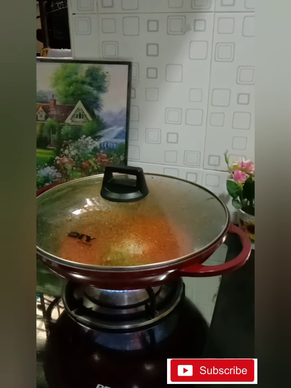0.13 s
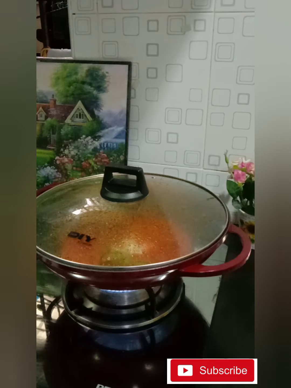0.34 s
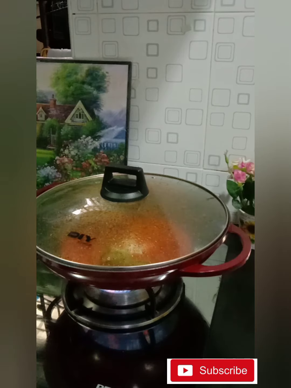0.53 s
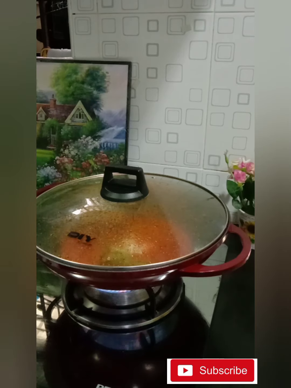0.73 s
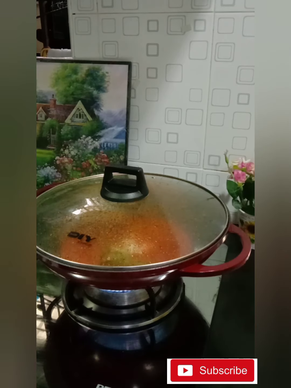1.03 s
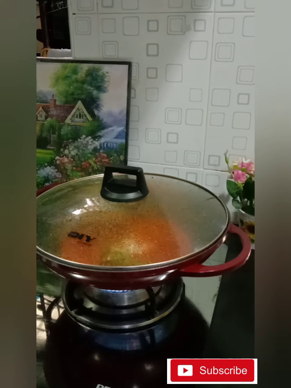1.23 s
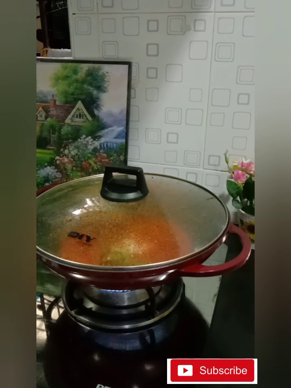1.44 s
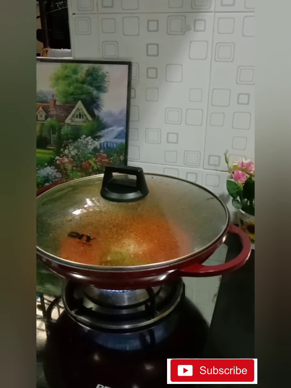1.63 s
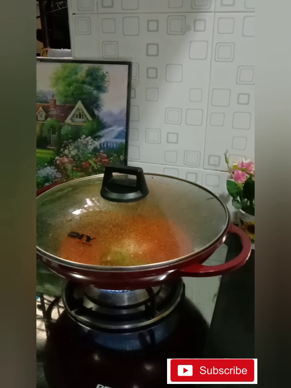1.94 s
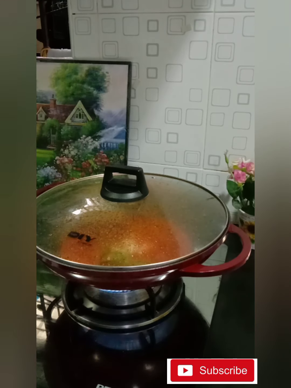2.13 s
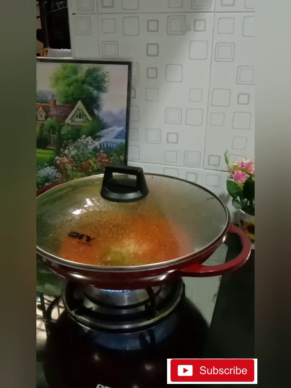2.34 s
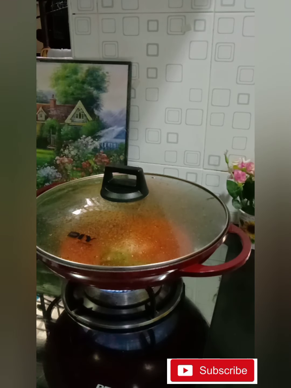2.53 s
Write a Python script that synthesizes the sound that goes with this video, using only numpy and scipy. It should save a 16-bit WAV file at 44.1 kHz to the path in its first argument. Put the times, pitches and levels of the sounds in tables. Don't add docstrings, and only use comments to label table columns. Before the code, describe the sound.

Paste frying in a lidded wok gives a steady faint fizz over a low burner hum, close to a phone microphone. Dishes tap at the start, then clink, scrape and clatter loudly late, with short room echo.

```python
import sys
import numpy as np
from scipy import signal
from scipy.fft import rfft, irfft
from scipy.io import wavfile
from scipy.ndimage import uniform_filter1d

SR = 44100
rng = np.random.default_rng(int(sys.argv[2]) if len(sys.argv) > 2 else 0)


def transcribe(signal):
    frames = np.atleast_2d(signal).T
    limited = np.clip(frames, -1, 1)
    pcm = np.round(limited * 32767).astype(np.int16)
    wavfile.write(sys.argv[1], SR, pcm)


def amplitude_ratio(level_db):
    exponent = np.asarray(level_db, float) / 20
    return 10 ** exponent


N = 119070


def evened(x):
    return x / np.sqrt(np.mean(x ** 2) + 1e-20)


def read(points, hz):
    f, value = np.transpose(points)
    return np.interp(np.log(hz + 1), np.log(f + 1), value)


def curve(points):
    return amplitude_ratio(np.interp(np.arange(N) / SR, *np.transpose(points)))


def colour(x, points):
    hz = np.fft.rfftfreq(len(x), 1 / SR)
    octaves_below = np.maximum(np.log2(points[0][0] / (hz + 1)), 0)
    return irfft(rfft(x) * amplitude_ratio(read(points, hz) - 22 * octaves_below), len(x))


def resonate(x, hz, width_hz):
    r = np.exp(-np.pi * width_hz / SR)
    gain = (1 - r * r) / 2
    return signal.lfilter([gain, 0, -gain], [1, -2 * r * np.cos(2 * np.pi * hz / SR), r * r], x)


def wander(seconds):
    size = max(int(seconds * SR), 2)
    return evened(uniform_filter1d(uniform_filter1d(rng.standard_normal(N), size), size))


def pops(per_s, spread_db):
    size = amplitude_ratio(spread_db * np.minimum(rng.exponential(1, N), 5))
    return size * (rng.random(N) < per_s / SR) * rng.choice([-1., 1.], N)


def air(rings, wander_db):
    total = np.zeros(N)
    for hz, width_hz, db in rings:
        mode = resonate(resonate(rng.standard_normal(N), hz, width_hz), hz, 2 * width_hz)
        total += amplitude_ratio(db + wander_db * wander(0.053)) * evened(mode)
    return evened(total)


def waver(hz, radians, seconds):
    return np.sqrt(2) * np.sin(2 * np.pi * hz * np.arange(N) / SR + radians * wander(seconds))


def drifting_tones(tones):
    t, out = np.arange(N) / SR, np.zeros(N)
    for start, length, hz, db in tones:
        shape = np.clip(np.minimum(t - start, start + length - t) / 0.011, 0, 1)
        out += amplitude_ratio(db) * shape * waver(hz, 1.04, 0.014)
    return out


# frequency_hz, density_db (per Hz)
FIZZ_SPECTRUM = [(2700, -22), (3100, -3), (3600, 0), (4000, -8.5), (5100, -5.5), (8000, -4.5), (16000, -8)]
# frequency_hz, width_hz, level_db
LID_RINGS = [(3655, 24, 0.5), (4394, 146, 4.5), (5690, 260, -3), (6640, 55, -6), (7390, 140, -2),
             (7940, 54, 2), (8360, 110, -3)]
# time_s, level_db
HEAT = [(0, -49.5), (.5, -50.5), (1.8, -49.5), (2.7, -50)]
FIZZ_DB, LID_RINGS_DB = -49, -5.5


def fizz():
    drive = rng.standard_normal(N) + amplitude_ratio(-8) * evened(pops(per_s=3300, spread_db=5.5))
    rings = np.zeros(N)
    for hz, width_hz, db in LID_RINGS:
        rings += amplitude_ratio(db + 2.3 * wander(0.033)) * evened(resonate(drive, hz, width_hz))
    flicker = amplitude_ratio(0.9 * wander(0.025) + 0.4 * wander(0.1))
    frying = evened(colour(drive, FIZZ_SPECTRUM)) + amplitude_ratio(LID_RINGS_DB) * evened(rings)
    return amplitude_ratio(FIZZ_DB) * evened(curve(HEAT)) * flicker * frying


# frequency_hz, width_hz, level_db
LID_AIR = [(526, 101, -1), (656, 170, 0), (791.6, 34, 0.5), (273, 110, -13.5)]
RIM_AIR = [(1228, 140, 6), (1306, 25, -4), (1434, 62, 1), (1598, 70, -5.5)]
GLASS_AIR = [(1919, 64, 1.5), (2132, 190, 0), (2387, 34, -3.5), (2920, 51, -3)]
# time_s, level_db
BUBBLING = [(0, -56.5), (.25, -54), (.42, -52.5), (.55, -65.5), (.7, -58.5), (.95, -52.5), (1.2, -52),
            (1.28, -64), (1.6, -58.5), (1.78, -55), (1.95, -53), (2.03, -67.5), (2.2, -54), (2.5, -52),
            (2.63, -59), (2.66, -51.5)]
STEAM = [(.3, -54.5), (.36, -63), (.5, -60), (.58, -53.5), (.68, -57.5), (.78, -54.5), (1.02, -54.5),
         (1.07, -55.5), (1.15, -51.5), (1.45, -61), (1.55, -54), (1.7, -62.5), (1.85, -57), (2.6, -51.5),
         (2.7, -59.5)]
SPATTER = [(.3, -62), (.36, -71), (.55, -68), (.6, -62), (1.2, -57), (1.26, -64), (1.45, -64.5),
           (1.55, -61.5), (1.75, -62.5), (2.1, -59), (2.7, -64.5)]


def simmer():
    bubbling = curve(BUBBLING) * air(LID_AIR, wander_db=1.2)
    steam = curve(STEAM) * air(RIM_AIR, wander_db=2.5)
    spatter = curve(SPATTER) * air(GLASS_AIR, wander_db=2.0)
    return bubbling + steam + spatter


# start_s, length_s, pitch_hz, level_db
GURGLES = [(0.79, 0.062, 250, -62), (0.62, .05, 290, -60), (2, 0.043, 352, -57.5), (2.115, .045, 150, -60),
           (1.33, .05, 1100, -53.5), (1.37, 0.053, 512, -58), (1.27, 0.052, 590, -61.5),
           (1.47, 0.126, 806, -52.5), (1.67, 0.066, 602, -55.5), (1, 0.117, 1655, -60.5),
           (1.73, 0.095, 1200, -59), (1.87, 0.11, 1442, -60), (.54, 0.108, 1100, -61),
           (1.63, 0.039, 76, -65.5), (.59, .05, 79, -69), (1.96, 0.033, 130, -64.5), (1.7, 0.04, 150, -65),
           (0.263, 0.08, 100, -68.5), (2.385, .04, 70, -63)]


def gurgles():
    return drifting_tones(GURGLES)


# start_s, peak_db, decay_s
SPITS = [
    (1.103, -33, 0.081),
    (1.64, -31, 0.059),
    (1.739, -26, .021),
    (1.822, -35, 0.12),
    (1.983, -41, .14),
]
# frequency_hz, density_db (per Hz)
SPIT_SPECTRUM = [(1200, -5.5), (2530, -0.5), (4360, 3), (6100, -5), (7820, 2), (16000, -18.5)]
SPIT_DB, SPIT_RISE_S = -14, 0.0062


def spits():
    t, level = np.arange(N) / SR, np.zeros(N)
    for start, db, decay_s in SPITS:
        u = np.maximum(t - start, 0)
        level += amplitude_ratio(db + SPIT_DB) * np.minimum(u / SPIT_RISE_S, 1) * np.exp(-u / decay_s)
    hiss = rng.standard_normal(N) + 0.66 * evened(pops(per_s=1500, spread_db=-1.5))
    return level * evened(colour(hiss, SPIT_SPECTRUM))


# start_s, length_s, pitch_hz, level_db
WHISTLES = [
    (1.538, 0.092, 12420, -56),
    (1.778, 0.023, 12850, -47.5),
]


def whistles():
    return drifting_tones(WHISTLES)


# start_s, level_db, rattle_s
TAP = [
    (.0132, -21.5, 0.0023),
    (.0165, -22.5, 0.0067),
    (.033, -31, 0.0029),
    (.052, -29.5, 0.0052),
    (.105, -47, 0.011),
]
# pitch_hz, level_db, t60_s
TAP_MODES = [(540, -12, .04), (1600, -8, .008), (2300, -7, .008), (5500, -19, .008), (7900, -15, .006)]
# frequency_hz, density_db (per Hz)
TAP_CRACK = [(260, -47), (540, -13), (1500, 2), (2500, 4.5), (3700, -5.5), (6000, -28), (8100, -15),
             (15900, -25)]
# start_s, level_db, rattle_s
NUDGE = [
    (2.357, -28.5, 0.0052),
    (2.369, -30, 0.012),
]
# start_s, level_db, rattle_s
CLINK = [
    (2.16, -31, 0.0041),
    (2.165, -28, 0.0034),
    (2.18, -32.5, 0.0052),
    (2.2, -33.5, 0.0094),
]
# pitch_hz, level_db, t60_s
CLINK_MODES = [(1580, 0, .03), (2480, 4, .04), (3005, 5, .07), (3840, -1, .02), (5520, -11, .01),
               (7340, -15, .02), (8300, -15, .01)]
# frequency_hz, density_db (per Hz)
CLINK_CRACK = [(600, -21.5), (1300, -5), (2000, -19.5), (3200, -6), (6700, -33), (8000, -17.5),
               (16000, -38)]
# start_s, level_db, rattle_s
SCRAPE = [
    (2.234, -26, 0.0079),
    (2.243, -27.5, 0.004),
    (2.252, -29, 0.004),
    (2.259, -29, 0.0036),
    (2.269, -32.5, 0.0035),
]
# pitch_hz, level_db, t60_s
SCRAPE_MODES = [(1380, -3, .03), (1760, 4, .05), (2980, -2, .02), (3790, -6, .03), (5350, -9, .008),
                (8080, -11, .006)]
# frequency_hz, density_db (per Hz)
SCRAPE_CRACK = [(450, -10), (1000, -10), (1500, 1), (2100, -12.5), (3100, 0), (6500, -19), (8100, -9),
                (16000, -23)]
# start_s, level_db, rattle_s
CLATTER = [
    (2.3785, -20, 0.0024),
    (2.3835, -13, 0.0027),
    (2.395, -21, 0.0044),
    (2.407, -21, 0.0063),
    (2.422, -39, 0.0016),
    (2.434, -26.5, 0.0051),
    (2.462, -31.5, 0.0053),
    (2.474, -35, 0.0062),
    (2.52, -38, 0.0043),
]
# pitch_hz, level_db, t60_s
CLATTER_MODES = [(370, -21, .04), (660, -21, .04), (1230, -3, .04), (1300, -2, .05), (1407, 0, .05),
                 (1517, 1, .05), (1612, -2, .05), (1722, -4, .05), (3390, -2, .03), (3512, 3, .03),
                 (3560, 2, .04), (3628, 0, .03), (5550, -17, .008), (8100, -14, .005)]
# frequency_hz, density_db (per Hz)
CLATTER_CRACK = [(160, -28), (420, -18.5), (1300, -6.5), (2100, -13.5), (3100, -4), (4700, -14.5),
                 (8000, -21), (15900, -26)]


def knocks():
    return [struck(TAP, TAP_MODES, TAP_CRACK), struck(CLINK, CLINK_MODES, CLINK_CRACK),
            struck(NUDGE, [], TAP_CRACK), struck(SCRAPE, SCRAPE_MODES, SCRAPE_CRACK),
            struck(CLATTER, CLATTER_MODES, CLATTER_CRACK)]


def struck(events, modes, crack):
    t, force = np.arange(N) / SR, np.zeros(N)
    grit, noise = rng.standard_normal((2, N))
    for start, db, rattle_s in events:
        u = np.maximum(t - start, 0) / rattle_s
        force += amplitude_ratio(db) * u * np.exp(1 - u ** 1.236)
    unit = np.sqrt(np.mean(colour(noise, crack) ** 2))
    body = np.zeros(N)
    for k, (hz, db, t60) in enumerate(modes):
        sign = (-1) ** k
        body += sign * amplitude_ratio(db + 13) * resonate(force * grit, hz, 2.2 / t60)
    return amplitude_ratio(-6) * colour(force * noise, crack) / unit + body


# start_s, peak_db, pitch_hz, t60_s
PINGS = [(.014, -22, 2210, 0.013), (0.031, -41, 5600, 0.052), (.054, -26.5, 2520, 0.024),
         (0.06, -34, 2440, 0.027), (.074, -38, 2270, 0.033), (.134, -48, 3460, 0.016),
         (2.162, -26, 1614, 0.035), (2.165, -21, 2480, 0.028), (2.167, -25.5, 3009, 0.12),
         (2.166, -34.5, 5560, 0.13), (2.202, -30, 2980, .06), (2.202, -31, 3770, .03),
         (2.241, -25, 5220, .04), (2.248, -25.5, 1789, 0.081), (2.258, -25, 3240, 0.035),
         (2.262, -27, 3820, 0.043), (2.271, -33.5, 5250, 0.13), (2.271, -35, 5600, 0.1),
         (2.297, -46, 5430, .08), (2.317, -35, 5510, 0.062), (2.3795, -7.5, 3492, 0.042),
         (2.3845, -7, 3517, 0.045), (2.386, -23.5, 8350, 0.039), (2.381, -23, 5600, .025),
         (2.396, -13.5, 1540, 0.02), (2.403, -30, 6260, 0.046), (2.406, -22.5, 1406, .06),
         (2.423, -22, 3580, 0.026), (2.433, -19, 3570, 0.026), (2.439, -31, 5450, 0.06),
         (2.463, -25, 3480, 0.033), (2.473, -28, 3540, 0.054), (2.487, -39, 3530, 0.03),
         (2.519, -35.5, 3540, 0.071), (2.52, -37, 904, 0.089)]


def pings():
    t, out = np.arange(N) / SR, np.zeros(N)
    for start, db, hz, t60 in PINGS:
        u = np.maximum(t - start, 0)
        rise = np.minimum(u / 0.0011, 1)
        out += amplitude_ratio(db - 60 * u / t60) * rise * np.sin(2 * np.pi * hz * u)
    return out


# frequency_hz, density_db (per Hz)
ROAR_SPECTRUM = [(25, -31.5), (150, -13.5), (400, -13), (1000, -15.5), (1500, -15.5), (2000, -35),
                 (2600, -61)]
# frequency_hz, width_hz, level_db
BURNER_AIR = [(891, 62, 1), (145, 31, -17), (74, 13, -23.5)]
# time_s, level_db
HUM = [(.17, -56), (.48, -56), (.64, -66.5), (.78, -56.5), (1.2, -54), (1.52, -52.5), (1.7, -58.5),
       (1.79, -50.5), (1.86, -59.5), (2.08, -52), (2.3, -56.5), (2.6, -63), (2.65, -55), (2.7, -62)]
ROAR_DB, HUM_AIR_DB, HUM_TONE_DB = -63.5, -2, -2.5


def burner():
    turbulence = rng.standard_normal(N) * amplitude_ratio(2.2 * wander(0.062))
    roar = amplitude_ratio(ROAR_DB) * evened(colour(turbulence, ROAR_SPECTRUM))
    breath = amplitude_ratio(HUM_AIR_DB) * air(BURNER_AIR, wander_db=1.5)
    core = amplitude_ratio(HUM_TONE_DB) * waver(hz=896, radians=1.54, seconds=0.014)
    return roar + curve(HUM) * (breath + core)


# frequency_hz, t60_s
KITCHEN = [(300, 0.37), (1000, 0.26), (3000, 0.25), (8000, 0.33), (15000, 0.28)]


def kitchen(x):
    taps = np.zeros(SR // 2)
    at = np.arange(200, SR // 2 - 20, 16)
    taps[at + rng.integers(0, 16, len(at))] = rng.choice([-1., 1.], len(at))
    hz, t, z = signal.stft(taps, SR, nperseg=256)
    decay = amplitude_ratio(-60 * t / read(KITCHEN, hz)[:, None])
    tail = signal.istft(z * decay, SR, nperseg=256)[1]
    return signal.fftconvolve(x, tail / np.linalg.norm(tail))[:N]


def scene():
    pan = fizz() + simmer() + gurgles() + spits() + whistles() + burner()
    room = sum(x + amplitude_ratio(-0.5) * kitchen(x) for x in knocks())
    clean = pings()
    return (pan + room + clean + amplitude_ratio(-4.5) * kitchen(clean))[None]


def roll_off(x):
    return signal.sosfilt(signal.butter(12, 17000, fs=SR, output="sos"), x)


# frequency_hz, level_db
MIC = [(20, -15), (100, 1), (8600, 1), (9200, -7.5), (11600, -6), (12200, 0), (15600, 3)]
EDGE_HZ, GATE_DB, GATE_OVER_DB = 15780, -3, 9


def record(dry):
    hz = np.fft.rfftfreq(N, 1 / SR)
    band = np.clip((EDGE_HZ - hz) / 100, 0, 1)
    heard = irfft(rfft(dry) * amplitude_ratio(read(MIC, hz)) * band, N)
    z = signal.stft(heard, nperseg=512)[2]
    power = uniform_filter1d(uniform_filter1d(abs(z) ** 2, size=7, axis=2), size=5, axis=1)
    db = 10 * np.log10(abs(power) + 1e-20)
    over = db - np.percentile(db, 15, axis=2, keepdims=True)
    z = z * amplitude_ratio(GATE_DB * np.clip(1 - over / GATE_OVER_DB, 0, 1))
    mix = signal.istft(z, nperseg=512)[1][:, :N]
    return roll_off(mix)


dry = scene()
out = record(dry)
transcribe(out)
```